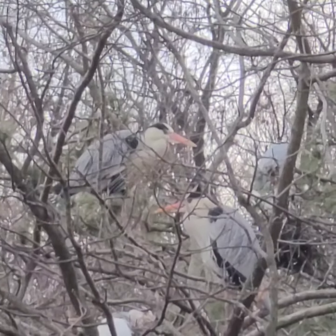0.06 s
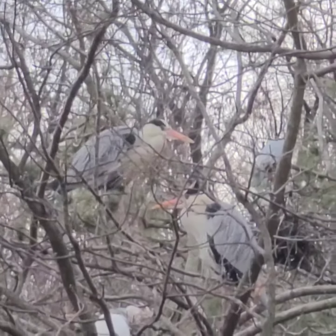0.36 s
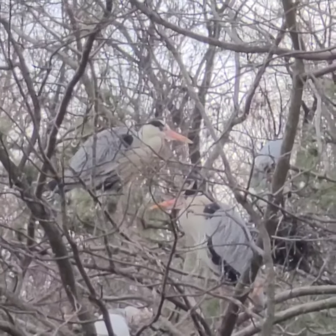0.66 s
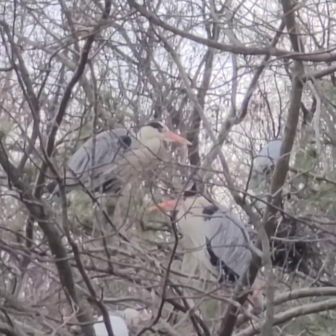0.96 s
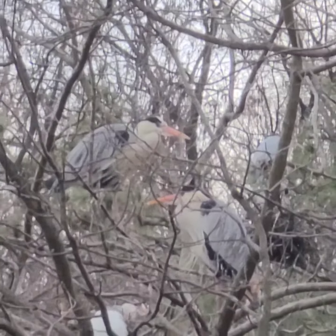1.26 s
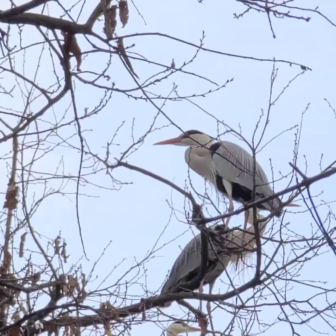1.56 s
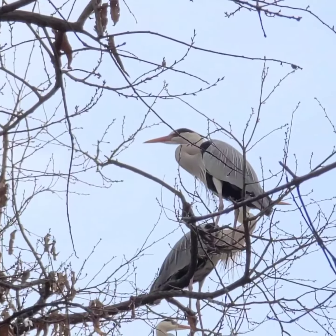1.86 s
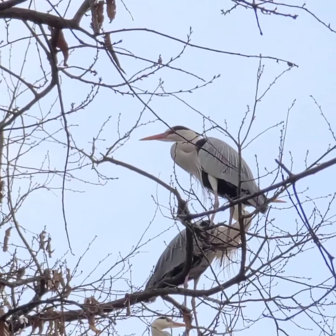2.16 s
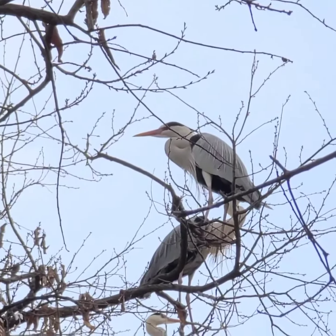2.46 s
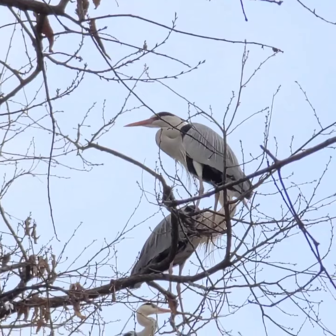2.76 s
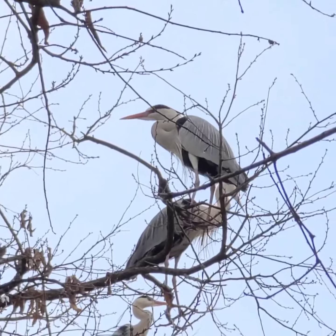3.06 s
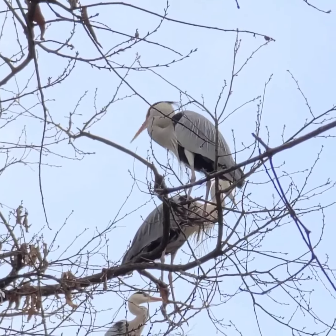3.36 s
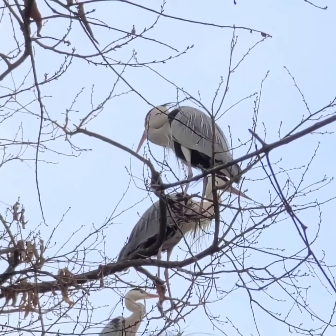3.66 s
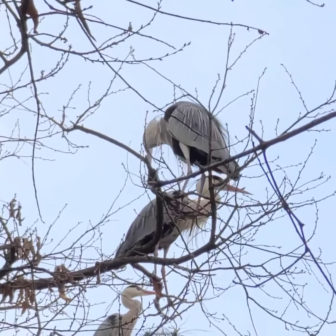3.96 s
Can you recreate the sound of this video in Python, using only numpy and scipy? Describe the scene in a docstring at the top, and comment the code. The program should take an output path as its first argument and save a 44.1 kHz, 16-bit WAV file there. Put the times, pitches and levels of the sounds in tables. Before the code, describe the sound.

Two herons call outdoors from nearby trees: a short harsh bark, then a longer fluttering croak, both slightly right of the microphone. Before them, distant traffic rumbles and cuts out briefly; afterwards a far engine swells and fades.

```python
"""At the first spot, distant traffic rumbles, a motor idles, a far engine passes and twigs tick.
The sound drops out briefly. At the second spot, with less traffic, grey herons call from bare nesting
trees: one gives a short harsh bark, another a longer, fluttering croak, both from slapping membranes
that ring the throat. A far engine then swells and fades while a small bird peeps."""
import sys
import numpy as np
from scipy import signal
from scipy.fft import rfft, irfft, next_fast_len
from scipy.io import wavfile
from scipy.ndimage import map_coordinates

SR = 44100
rng = np.random.default_rng(int(sys.argv[2]) if len(sys.argv) > 2 else 0)


def generate_wav(signal):
    """Clip the signal to [-1, 1] and save it as 16-bit WAV at the path in sys.argv[1]."""
    frames = np.transpose(np.atleast_2d(signal))
    scaled = np.clip(frames, -1, 1) * 32767
    pcm = np.round(scaled).astype(np.int16)
    wavfile.write(sys.argv[1], SR, pcm)


N = 176400

# Levels in the tables are relative: each source adds its own gain.
# traffic at the first spot: frequency_hz, density_db
FIRST_TRAFFIC_COLOUR = [(12, -63), (20, -3), (40, -18), (53, 5), (70, -1.5), (78, -3), (92, -13),
                        (126, -13.5), (171, -7.5), (213, -14.5), (298, -19.5), (362, -18.5), (439, -29),
                        (597, -25), (649, -28), (1040, -26.5), (1630, -30), (1870, -34), (3170, -38.5),
                        (4430, -49), (5090, -49), (7520, -65), (15500, -64)]
# how alike the two microphones hear it: frequency_hz, correlation
FIRST_LIKENESS = [(60, 0.9), (150, 1), (350, 0.61), (700, 0.007), (1400, 0), (8000, 0.033)]
# its rise and fall: time_s, rumble_db, hiss_db
FIRST_TRAFFIC_LEVEL = [(0.0, -33, -46), (0.256, -36, -47), (0.76, -33, -45), (1.136, -34, -46.5),
                       (1.22, -34, -44), (1.3, -34, -46)]
# an idling motor's drone: time_s, level_db
IDLE_LEVEL = [(0, -25), (.25, -32.5), (.33, -25.5), (.55, -30), (.66, -51), (.75, -47), (1.3, -34)]
# far engine at the first spot: time_s, pitch_hz, level_db
FIRST_PASS = [(0, 176, -47.5), (.28, 176, -42), (.45, 180, -35), (.7, 184, -31), (.85, 182, -39),
              (1, 181, -42.5), (1.3, 180, -41)]
# its harmonics: multiple, level_db
FIRST_HARMONICS = [(1, -11), (2, -4.5)]
# rustling twigs: time_s, level_db
RUSTLE_LEVEL = [(.6, -80), (.95, -63), (1.17, -57), (1.2, -53), (1.31, -77)]
# their colour: frequency_hz, density_db
RUSTLE_SPECTRUM = [(2500, -13), (4400, 7), (5300, 11.5), (6500, -1), (9000, -9.5), (14000, -20)]
# single twigs ticking: start_s, peak_db
TWIG_TICKS = [(.848, -65), (.93, -55), (.962, -71), (1.077, -60), (1.183, -58), (1.242, -58)]

# traffic at the second spot: frequency_hz, density_db
SECOND_TRAFFIC_COLOUR = [(12, -37), (20, 3), (33, 1.5), (80, 5.5), (153, -12.5), (213, -14.5), (245, -19),
                         (298, -19), (333, -25), (362, -18.5), (427, -23.5), (534, -27), (631, -29),
                         (686, -30), (746, -28), (906, -31), (1200, -33), (1720, -37.5), (3000, -37.5),
                         (4430, -50.5), (7950, -57.5), (8880, -63.5), (15500, -59.5)]
# how alike the two microphones hear it: frequency_hz, correlation
SECOND_LIKENESS = [(60, .97), (150, 0.98), (350, 0.57), (700, 0.16), (1400, 0), (8000, 0)]
# its rise and fall: time_s, rumble_db
SECOND_RUMBLE_LEVEL = [(1.42, -38.5), (1.51, -36.5), (1.67, -36), (2.0, -35), (3.4, -34), (3.63, -37.5),
                       (4.0, -35)]
# each heron's effort: time_s, level_db, treble_db
BARK_DRIVE = [(1.835, -49.5, -16), (1.859, -45.5, -26.5), (1.865, -22, -32), (1.885, -22.5, -14.5),
              (1.908, -23, -18), (1.926, -28, -11.5), (1.938, -36, -7.5), (1.97, -52.5, 1.5),
              (2.03, -65, 6.5)]
CROAK_DRIVE = [(2.335, -77, -26), (2.375, -38, -20.5), (2.39, -31.5, -24), (2.42, -30.5, -19),
               (2.455, -25.5, -26), (2.49, -27, -22.5), (2.517, -24, -28), (2.535, -28, -24),
               (2.558, -26, -14), (2.575, -45.5, -8), (2.6, -53, 6.5)]
# its membranes: time_s, pitch_hz, roughness (0-1)
BARK_MEMBRANES = [(1.86, 325, .6), (1.872, 305, .35), (1.883, 289, .18), (1.908, 284, .25),
                  (1.92, 288, .65), (1.945, 280, .85)]
CROAK_MEMBRANES = [(2.38, 285, .6), (2.425, 290, .35), (2.455, 307, .25), (2.485, 307, .16),
                   (2.515, 303, .12), (2.535, 298, .22), (2.547, 277, .45), (2.58, 266, .55)]
# resonance of its throat and open bill: frequency_hz, gain_db
BARK_RESONANCE = [(200, -45), (520, -17.5), (850, -18.5), (1180, -0.5), (1450, -0.5), (1650, -4.5),
                  (2300, -1.5), (2480, -14.5), (2650, -2.5), (2900, -4.5), (3100, -14.5), (4650, -14.5),
                  (5200, -24.5), (6000, -18), (7200, -27.5), (9300, -32), (10200, -49.5), (15000, -55)]
CROAK_RESONANCE = [(200, -34), (500, -23), (760, -23), (930, -8), (1060, -3), (1180, 3), (1290, -4),
                   (1400, -8), (1700, -5), (1950, -5), (2130, 3), (2300, -6), (2460, -3), (2900, -5),
                   (3500, -16), (4000, -24), (4850, -21), (6300, -27), (7500, -38), (9000, -51),
                   (13000, -68)]
# the grove's echo: frequency_hz, t60_s
GROVE_DECAY = [(300, .5), (2000, .5), (5000, .36), (12000, .28)]
# far engine at the second spot: time_s, pitch_hz, level_db
SECOND_PASS = [(2.55, 197.7, -52.5), (2.7, 205, -51), (2.85, 216.1, -43), (3.1, 214, -42.5),
               (3.3, 207, -49.5), (3.6, 188, -51.5), (4, 156.8, -53)]
# its harmonics: multiple, level_db
SECOND_HARMONICS = [(1, 3), (2, -12)]
# small bird's notes: start_s, length_s, start_hz, end_hz, level_db
BIRD_PEEPS = [(3.02, 0.083, 6900, 6400, -72), (3.253, .1, 8260, 7700, -68), (3.345, .06, 6830, 6500, -69),
              (3.738, 0.031, 8150, 7886, -66.5), (3.775, .05, 7600, 7100, -73)]


def amp(db):
    """Decibels to gain."""
    return 10 ** (np.asarray(db) / 20)


def unit(x):
    """Scale to rms 1."""
    return x / np.sqrt(np.mean(x ** 2) + 1e-20)


def along(points, hz):
    """Read (frequency_hz, value) points on a log frequency axis."""
    point_hz, values = np.transpose(points)
    return np.interp(np.log(hz + 1), np.log(point_hz + 1), values)


def clock():
    """The time of each sample in seconds."""
    return np.arange(N) / SR


def curves(rows):
    """One value per sample for each column after the time."""
    time_s, *columns = np.transpose(rows)
    return [np.interp(clock(), time_s, column) for column in columns]


def during(rows):
    """1 from the first row's time to the last's."""
    return (clock() >= rows[0][0]) & (clock() <= rows[-1][0])


def wobble(rate):
    """A smooth random curve, rate knots a second."""
    return map_coordinates(rng.standard_normal(int(N * rate / SR) + 4), [clock() * rate])


def filtered(x, response):
    """Filter x by a complex response of frequency."""
    size = next_fast_len(N + SR // 2)
    return irfft(rfft(x, size) * response(np.fft.rfftfreq(size, 1 / SR)), size)[..., :N]


def split(x, edge_hz):
    """The parts below and above an edge."""
    low = filtered(x, lambda hz: 1 / (1 + (hz / edge_hz) ** 12))
    return low, x - low


def resonate(x, colour, size=2048):
    """Minimum-phase filter with the given (frequency_hz, gain_db) shape."""
    gain = amp(along(colour, np.fft.rfftfreq(size, 1 / SR)))
    cepstrum = irfft(np.log(gain))
    cepstrum[1:size // 2] *= 2
    cepstrum[size // 2 + 1:] = 0
    return signal.fftconvolve(x, irfft(np.exp(rfft(cepstrum))))[:N]


def rush(colour, likeness):
    """Coloured noise of rms 1, partly alike at the two microphones."""
    def mid_side_gains(hz):
        angle = np.arccos(np.clip(along(likeness, hz), -1, 1)) / 2
        return amp(along(colour, hz)) * [np.cos(angle), np.sin(angle)]
    mid, side = filtered(rng.standard_normal((2, N)), mid_side_gains)
    return unit(np.array([mid + side, mid - side]))


def first_traffic():
    """Distant traffic: a centred rumble under a wide, wavering hiss."""
    rumble_db, hiss_db = curves(FIRST_TRAFFIC_LEVEL)
    _, mean_rumble_db, mean_hiss_db = np.mean(FIRST_TRAFFIC_LEVEL, axis=0)
    rumble, hiss = split(rush(FIRST_TRAFFIC_COLOUR, FIRST_LIKENESS), edge_hz=241)
    rumble *= amp(rumble_db - mean_rumble_db - 5)
    hiss *= amp(hiss_db - mean_hiss_db + 0.4 * wobble(8.67))
    return amp(-28) * (rumble + hiss)


def idling_motor(pitch_hz=60.65, gain_db=-3.5):
    """A motor at idle drones on one low, unsteady tone."""
    level_db, = curves(IDLE_LEVEL)
    phase = 2 * np.pi * np.cumsum(pitch_hz + 1.3 * wobble(12.56)) / SR
    return np.sqrt(2) * amp(level_db + gain_db) * np.sin(phase)


def far_engine(passage, harmonics):
    """An engine's low harmonics, wavering on their long way to the microphones."""
    pitch_hz, level_db = curves(passage)
    phase = 2 * np.pi * np.cumsum(pitch_hz * (1 + 0.0042 * wobble(20))) / SR
    drone = sum(amp(level_db + harmonic_db + 0.4 * wobble(6.5)) * np.sin(multiple * phase)
                for multiple, harmonic_db in harmonics)
    return during(passage) * np.sqrt(2) * drone


def twigs(tick_t60_s=.012, tick_gain_db=7):
    """Twigs rustle lightly and tick in dry, fast-dying bursts of noise."""
    t = clock()
    envelope = sum(amp(peak_db + tick_gain_db - 60 * np.abs(t - start_s) / tick_t60_s) * (t >= start_s)
                   for start_s, peak_db in TWIG_TICKS)
    ticks = envelope * rng.standard_normal((2, N))
    rustle_db, = curves(RUSTLE_LEVEL)
    rustle = amp(rustle_db) * rush(RUSTLE_SPECTRUM, likeness=[(1000, .1)])
    return ticks + during(RUSTLE_LEVEL) * rustle


def second_traffic():
    """Fainter traffic: a slowly swelling rumble under a nearly steady hiss."""
    rumble_db, = curves(SECOND_RUMBLE_LEVEL)
    low, high = split(rush(SECOND_TRAFFIC_COLOUR, SECOND_LIKENESS), edge_hz=241)
    rumble = amp(-34.5 + rumble_db - rumble_db.mean()) * unit(low)
    hiss = amp(-47 + 0.14 * wobble(4.86)) * unit(high)
    return rumble + hiss


def syrinx(membranes, throat, jitter=.023, scatter_db=1.8, puff_decay=.9):
    """Uneven membrane slaps, each with a puff of turbulence, ring the throat."""
    pitch_hz, roughness = curves(membranes)
    cycles = np.cumsum(pitch_hz * (1 + jitter * wobble(320))) / SR
    slaps = np.diff(np.floor(cycles), prepend=0) * amp(scatter_db * rng.standard_normal(N))
    puffs = rng.standard_normal(N) * np.exp(-puff_decay * (cycles % 1))
    source = np.sqrt(1 - roughness) * unit(slaps) + np.sqrt(roughness) * unit(puffs)
    return unit(resonate(source, throat))


def heron_call(effort, membranes, throat, lift_db):
    """Effort sets the level; the treble opens with the bill."""
    level_db, treble_db = curves(effort)
    body, treble = split(syrinx(membranes, throat), edge_hz=3900)
    return during(effort) * amp(level_db) * (unit(body) + amp(treble_db + lift_db) * unit(treble))


def in_trees(x, pan_db=0, lead_s=0, grove_db=-11, branch_db=-7, branch_t60_s=.08):
    """Direct sound and scatter from near branches reach two microphones, then the grove's tail."""
    def echo(response):
        response = response / np.linalg.norm(response, axis=1, keepdims=True)
        return signal.fftconvolve(x[None], response, axes=1)[:, :N]
    hz, t, noise = signal.stft(rng.standard_normal((2, SR // 2)), SR, nperseg=256)
    grove_fade = amp(-60 * t / along(GROVE_DECAY, hz)[:, None])
    _, tail = signal.istft(noise * grove_fade, SR, nperseg=256)
    branch_fade = amp(-60 * np.arange(SR // 8) / SR / branch_t60_s)
    scatter = rng.standard_normal((3, SR // 8)) * branch_fade
    branches = scatter[0] + scatter[1:]  # half the power is common to both microphones
    sides = np.array([[.5], [-.5]])  # pan_db and lead_s are left minus right
    direct = filtered(x, lambda hz: np.exp(2j * np.pi * hz * lead_s * sides))
    early = direct + amp(branch_db) * echo(branches)
    return amp(pan_db * sides) * early + amp(grove_db) * echo(tail)


def heron_bark():
    """One short harsh call from the trees, right of centre."""
    bark = amp(-1) * heron_call(BARK_DRIVE, BARK_MEMBRANES, BARK_RESONANCE, lift_db=2.8)
    return in_trees(bark, pan_db=-4, lead_s=-.00002)


def heron_croak(flutter_hz=32.4, depth_db=6, peak_s=2.391, fade_s=0.18):
    """Another heron answers from the trees, with a tremor that eases as it goes on."""
    t = clock() - peak_s
    tremor_db = depth_db * np.exp(-np.abs(t) / fade_s) * np.cos(2 * np.pi * flutter_hz * t)
    croak = amp(2) * heron_call(CROAK_DRIVE, CROAK_MEMBRANES, CROAK_RESONANCE, lift_db=2.5)
    return in_trees(amp(tremor_db) * croak, pan_db=-3, lead_s=.00032)


def small_bird(warble_hz=330):
    """Thin falling peeps far off in the trees, more echo than direct sound."""
    song = np.zeros(N)
    for start_s, length_s, start_hz, end_hz, level_db in BIRD_PEEPS:
        progress = np.clip((clock() - start_s) / length_s, 0, 1)
        pitch_hz = start_hz + (end_hz - start_hz) * progress + warble_hz * wobble(150)
        envelope = amp(level_db) * np.sqrt(np.abs(np.sin(np.pi * progress)))
        song += envelope * np.sin(2 * np.pi * np.cumsum(pitch_hz) / SR)
    return in_trees(amp(-4.5) * song, grove_db=5.5)


def scene(gap_start_s=1.3145, gap_end_s=1.3995):
    """The microphones at one spot, a moment of silence, then at the other."""
    first_spot = first_traffic() + idling_motor() + far_engine(FIRST_PASS, FIRST_HARMONICS) + twigs()
    second_spot = second_traffic() + heron_bark() + heron_croak()
    second_spot += far_engine(SECOND_PASS, SECOND_HARMONICS) + small_bird()
    return first_spot * (clock() < gap_start_s) + second_spot * (clock() > gap_end_s)


def record(dry):
    """The camera keeps nothing above its band limit."""
    return filtered(dry, lambda hz: hz < 15800)


dry = scene()
out = record(dry)
generate_wav(out)
```